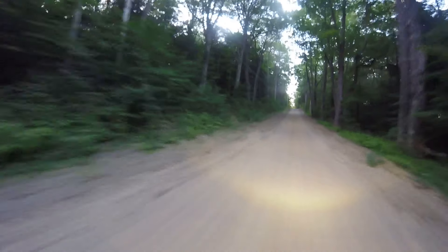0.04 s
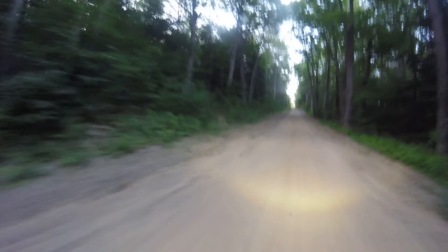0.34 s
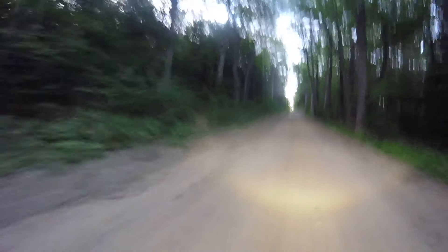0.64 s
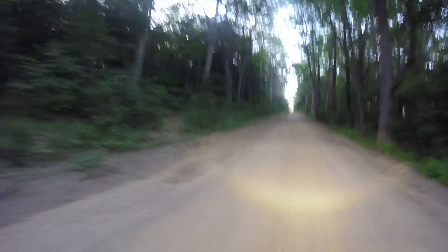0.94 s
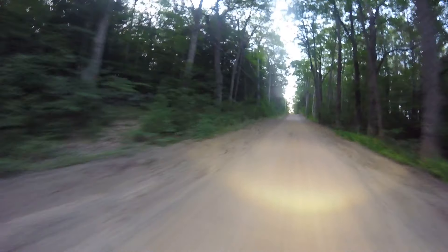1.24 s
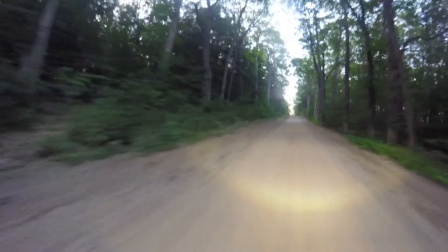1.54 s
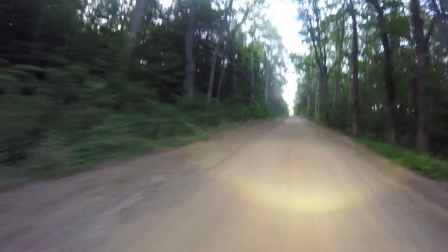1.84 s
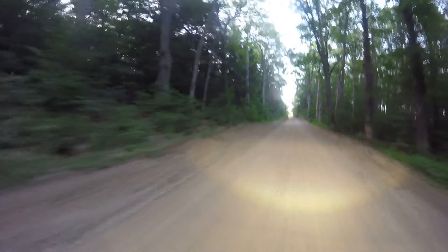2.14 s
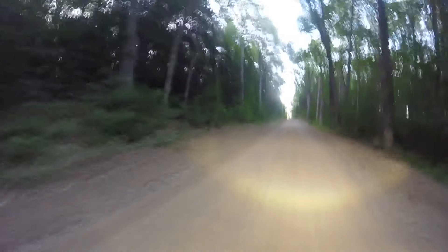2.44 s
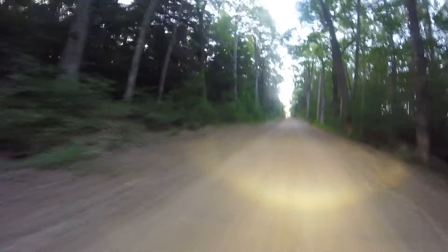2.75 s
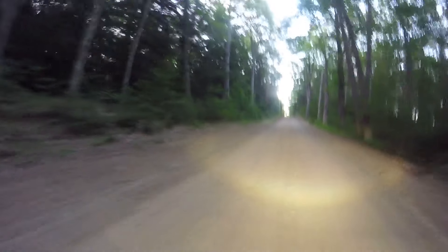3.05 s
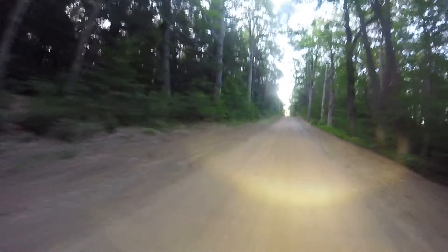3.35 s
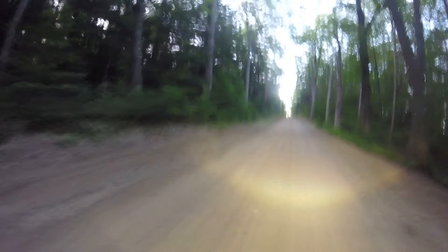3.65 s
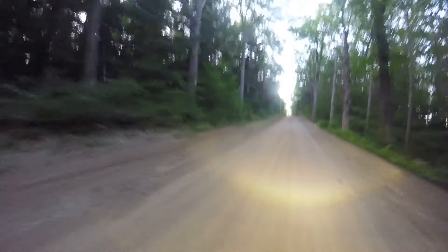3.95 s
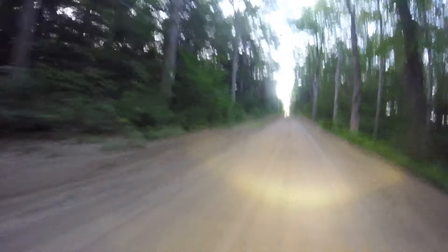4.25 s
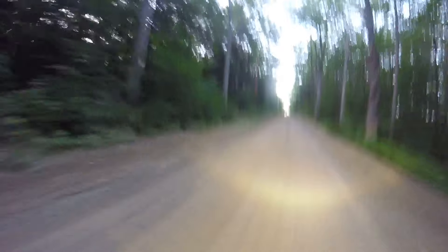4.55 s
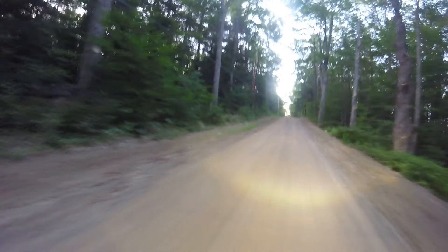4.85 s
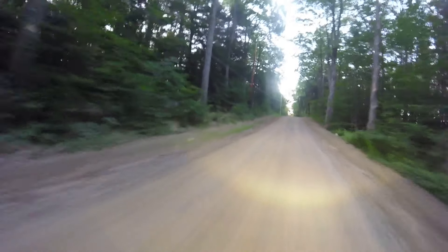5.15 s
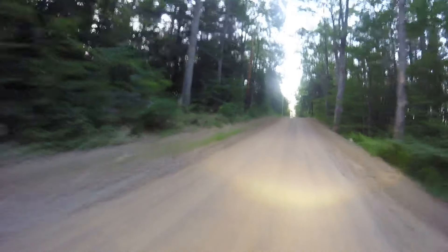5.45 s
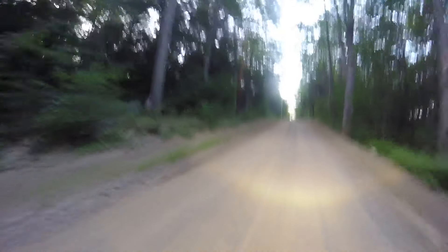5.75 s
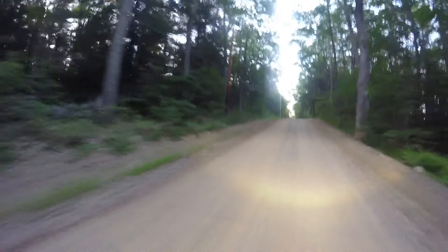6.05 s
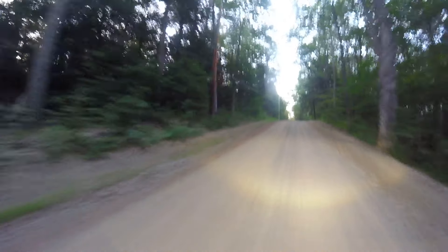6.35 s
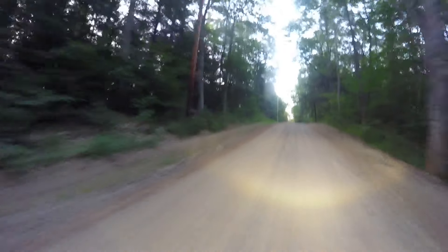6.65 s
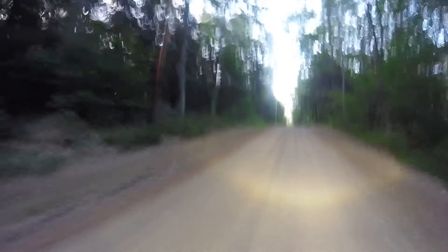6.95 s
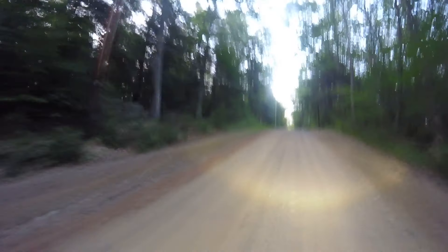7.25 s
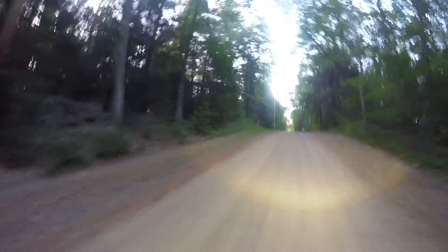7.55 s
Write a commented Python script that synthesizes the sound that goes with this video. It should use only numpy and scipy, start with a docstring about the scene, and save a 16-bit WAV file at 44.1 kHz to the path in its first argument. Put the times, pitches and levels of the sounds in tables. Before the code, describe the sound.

A vehicle drives fast along a dirt forest road, heard from a shaking microphone mounted on its outside. A deep, fluttering rumble of vibration, engine, tyres and wind runs throughout, swelling on bumps and dipping briefly. Under it lie a faint road hiss and a light crackle from the mount. Grit and small stones tick against the microphone's case, with occasional dull knocks, tiny clinks and faint squeals.

```python
"""A camera mount shakes about 32 times a second on the outside of a vehicle speeding along a dirt road.
The mount crackles at the ends of its widest swings, and gravel ticks against the camera's hard case.
Engine, tyres and wind boom through the vehicle's body, hard bumps knock, and the road hisses faintly.
Loose parts clink, scrape and squeal now and then. A limiter turns the sound down on the strongest swings."""
import sys
import numpy as np
from scipy import signal
from scipy.fft import rfft, irfft, next_fast_len
from scipy.io import wavfile
from scipy.ndimage import uniform_filter1d

SR = 44100
rng = np.random.default_rng(int(sys.argv[2]) if len(sys.argv) > 2 else 0)


def wav_record(signal):
    """Record a signal, one row per channel, as 16-bit PCM in the file named by sys.argv[1]."""
    frames = np.transpose(np.atleast_2d(signal))
    bounded = np.clip(frames, -1, 1)
    # unit amplitude maps onto the largest positive 16-bit level
    quanta = np.round(bounded * 32767).astype(np.int16)
    wavfile.write(sys.argv[1], SR, quanta)


N = 339570

# Tyres hissing on dirt. Each row: time in seconds, relative level in dB.
HISS_LEVELS = [(0.0, -50.5), (0.22, -50), (0.42, -57), (0.65, -54.5), (1.0, -51.5), (1.35, -51.5),
               (1.65, -50), (1.88, -48.5), (2.2, -53), (2.45, -56.5), (2.73, -52.5), (3.0, -52),
               (3.3, -51.5), (3.53, -50), (3.7, -52), (4.0, -49.5), (4.27, -52.5), (4.62, -54), (5.05, -52),
               (5.23, -50.5), (5.45, -51), (5.63, -50), (5.8, -52.5), (6.05, -54.5), (6.2, -50.5),
               (6.38, -59.5), (6.5, -48), (6.9, -52), (7.1, -54), (7.35, -49.5), (7.58, -49.5), (7.7, -46)]
# Fine sand washing off the tyres. Each row: time in seconds, level in dB compared with the hiss.
SAND_LEVELS = [(0.0, -8), (0.35, -4.5), (1.25, -7.5), (1.52, -3.5), (1.74, -5.5), (1.92, -5), (2.68, -8.5),
               (3.5, -9), (4.2, -9.5), (4.45, -5), (4.9, -6.5), (5.27, -6.5), (6.68, -5.5), (7.0, -9),
               (7.7, -7.5)]
# Lulls in the ride. Each row: middle in seconds, length in seconds, then how far the shaking,
# the rumble and the hiss change, in relative dB. Below zero is a dip, above zero a rise.
RIDE_LULLS = [(0.22, 0.078, -12.5, 4.5, 5), (0.326, 0.07, -15.5, -7, 1), (0.457, 0.071, -6.5, -3, 2.5),
              (0.608, 0.14, -6.5, -4, 1.5), (0.821, 0.1407, -15.5, -4.5, -7),
              (0.958, 0.068, -13.5, -11.5, -0.5), (1.312, 0.073, -13, -1.5, -0.5),
              (1.469, 0.063, -8.5, -1.5, -4.5), (1.539, 0.049, -13, -2, 1), (1.808, 0.06, -10.5, -3.5, 1),
              (1.976, 0.13, -9, -0.5, -8), (2.26, 0.068, -10.5, -5.5, 3.5), (2.561, 0.0968, -15.5, -5.5, 2),
              (2.645, 0.053, -16.5, -11.5, -1), (2.842, 0.13, -10, -3.5, -3.5),
              (2.962, 0.055, -5.5, -17, -4), (3.089, 0.139, -17, -4.5, -5), (3.323, 0.12, -7.5, -2.5, -5),
              (3.473, 0.059, -15.5, -4, -6), (3.726, 0.077, -5, -5, -1), (3.828, 0.11, -14, -6.5, -6),
              (3.951, 0.076, -11, -1, -2.5), (4.241, 0.0939, -15.5, -5.5, -1), (4.378, 0.092, -7, 3.5, 0),
              (4.777, 0.16, -7, -10.5, -2), (4.965, 0.052, -6, 0, 4), (5.132, 0.15, -4.5, -2, -5),
              (5.503, 0.063, -12.5, -3, -7), (5.906, 0.25, -2.5, -6, -5.5), (6.305, 0.081, -9.5, -2, 0),
              (6.611, 0.05, -8.5, 1, -7), (6.719, 0.13, -10.5, 1.5, -5.5), (6.884, 0.069, -11.5, 0.5, 2),
              (6.999, 0.063, -11.5, -8, 0), (7.2, 0.12, -1, -15.5, -8.5), (7.392, 0.1, -8.5, -5, -4.5),
              (7.499, 0.073, -17.5, -6, -4), (7.661, 0.1, -24, -6.5, -11.5)]
# Bumps in the road. Each row: middle in seconds, relative boom level in dB, relative panel level in dB.
ROAD_BUMPS = [(0.045, -16, -28), (0.249, -18, -28.5), (0.352, -16.5, -26), (0.701, -22.5, -30.5),
              (1.3, -19.5, -29.5), (1.44, -16, -31.5), (1.582, -16, -24), (1.7, -17, -21),
              (1.869, -14.5, -26.5), (2.099, -18.5, -31), (2.29, -24.5, -27.5), (2.641, -11, -26),
              (2.889, -17, -33), (3.01, -16.5, -29.5), (3.231, -16.5, -34.5), (3.389, -19, -33),
              (3.521, -15, -33), (4.01, -20, -30.5), (4.16, -21.5, -31.5), (4.271, -13, -24),
              (4.543, -17.5, -26), (5.031, -19, -28.5), (5.24, -19, -28.5), (5.36, -20.5, -22),
              (5.661, -20.5, -26.5), (6.188, -11, -25.5), (6.499, -17.5, -26.5), (6.633, -19, -20.5),
              (6.74, -21, -27), (7.04, -21.5, -31), (7.431, -15, -32.5), (7.541, -22.5, -26)]
# Hard bumps. Each row: start in seconds, relative knock level in dB, relative thud level in dB.
HARD_JOLTS = [(0.234, -43, -20.5), (0.692, -50, -17), (1.85, -32, -16.5), (2.863, -33, -23.5),
              (4.27, -46, -26), (4.542, -28, -18.5), (6.624, -33, -21.5), (6.711, -44, -22)]
# Faint squeals. Each row: middle in seconds, length in seconds, pitch in Hz, width of the resonance
# in Hz (wider is hoarser), relative level in dB.
RUB_SQUEALS = [(0.164, 0.52, 1310, 37, -54.5), (0.244, 0.063, 1326, 170, -43.5),
               (0.09, 0.37, 1506, 18, -56), (0.35, 0.13, 1474, 70, -57.5), (.42, 0.26, 620, 14, -58),
               (0.928, 0.22, 1297, 51, -58.5), (1.384, 0.55, 1163, 25, -58.5),
               (2.069, 0.15, 1320, 28, -54.5), (2.783, 0.19, 1307, 20, -56.5), (4.101, 0.18, 1090, 73, -57),
               (4.234, 0.12, 1370, 130, -56), (4.445, 0.12, 2560, 130, -61),
               (4.876, 0.072, 1270, 100, -50.5), (5.22, 0.087, 1300, 91, -54.5),
               (5.23, 0.083, 1500, 64, -55.5), (5.414, 0.35, 976, 46, -58)]
# Loose parts dragging. Each row: middle in seconds, length in seconds, pitch in Hz, level in dB.
PART_SCRAPES = [(0.244, 0.03, 2830, -46.5), (2.59, 0.0067, 3180, -44), (2.728, 0.0068, 3420, -43),
                (2.863, 0.041, 2620, -51), (2.884, 0.0059, 3450, -41), (2.985, 0.01, 3420, -48),
                (4.198, 0.012, 2800, -47.5), (4.535, 0.021, 2670, -38), (6.496, 0.01, 3030, -39),
                (6.631, 0.013, 3160, -40), (6.715, 0.0057, 2650, -41), (6.721, 0.063, 2550, -45),
                (6.894, 0.01, 3080, -41), (7.226, 0.015, 2550, -47)]
# Loose parts being tapped. Each row: start in seconds, peak level in dB, pitch in Hz.
PART_CLINKS = [(0.072, -31.5, 1850), (1.385, -37, 1780), (1.929, -31.5, 1780), (3.164, -39, 1710),
               (4.168, -35.5, 1750), (4.546, -25, 2770), (5.932, -39, 1530), (6.035, -34, 1744),
               (6.432, -33, 1590), (7.041, -26.5, 3060)]
# Scuffs of loose grit. Each row: middle in seconds, relative peak level in dB.
GRIT_SCUFFS = [(0.254, -34.5), (0.265, -38), (0.364, -37.5), (0.373, -39), (0.392, -34.5), (0.483, -37),
               (0.514, -35.5), (0.529, -35), (0.702, -35), (0.718, -37), (0.759, -35.5), (0.893, -39.5),
               (0.905, -36.5), (0.992, -41), (1.024, -42.5), (1.062, -46), (1.13, -37), (1.162, -36),
               (1.388, -44), (1.416, -35.5), (1.7, -35.5), (1.716, -39), (1.740, -36.5), (1.757, -35.5),
               (1.896, -31.5), (2.119, -35.5), (2.182, -36.5), (2.297, -37), (2.309, -36), (2.387, -32),
               (2.446, -36.5), (2.683, -35.5), (2.729, -37), (2.739, -33), (2.753, -42), (2.771, -35.5),
               (2.891, -38), (3.165, -39), (3.267, -44), (3.411, -38.5), (3.518, -39), (3.53, -35.5),
               (3.547, -31), (3.759, -35), (3.770, -37), (3.877, -36), (4.005, -37), (4.289, -30),
               (4.543, -30), (4.558, -42), (4.662, -34.5), (4.902, -38.5), (5.014, -35), (5.059, -34),
               (5.264, -38), (5.431, -34), (5.55, -36.5), (5.565, -39), (5.691, -34), (6.129, -37.5),
               (6.191, -34), (6.222, -32.5), (6.24, -34), (6.496, -35.5), (6.513, -33.5), (6.639, -35),
               (6.783, -36), (6.831, -38), (6.897, -41), (6.915, -31), (7.041, -39), (7.321, -36),
               (7.456, -33), (7.542, -35), (7.551, -32)]
# Stones hitting the case. Each row: time in seconds, relative level in dB, relative treble in dB.
STONE_HITS = [(0.708, -24.5, -20), (2.399, -23, -16), (3.0173, -24.5, -20.5), (3.6395, -20.5, -14),
              (4.2769, -27.5, -36), (4.5437, -23, -27), (4.6456, -22.5, -16.5), (5.6949, -16, -14.5),
              (5.8306, -19, -14), (6.7982, -24.5, -14), (6.9062, -26, -14), (6.9558, -25, -15),
              (7.1599, -19.5, -14), (7.5844, -23.5, -18)]
# The tones the case rings with. Each row: pitch in Hz, width in Hz, relative level in dB.
CASE_TONES = [(1490, 180, -2.5), (2250, 350, 4.5), (3140, 410, 2), (4010, 260, -3.5), (4960, 780, -3),
              (6670, 520, -2.5), (8200, 1100, -15.5), (11200, 2500, -24.5), (14700, 1200, -23)]

# The tone colour of each noise. Each row: frequency in Hz, relative level in dB.
SPRAY_COLOUR = [(3800, 2.5), (6500, -2), (7600, -7.5), (11000, -12), (16000, -19.5)]  # the finest gravel on the case
HISS_COLOUR = [(250, 4.5), (450, 6.5), (800, 0), (1100, 4.5), (1400, 4), (1850, -8), (2100, -11)]  # tyres and air
SAND_COLOUR = [(2000, -5.5), (2550, 1.5), (2780, -5.5), (3000, 1.5), (3400, -0.5), (4000, -14.5),
               (5200, -16.5), (6500, -25.5), (8000, -34), (16000, -48.5)]  # sand off the tyres
CRUNCH_COLOUR = [(200, -19.5), (500, 1.5), (900, 2.5), (1600, 1.5), (3000, -5.5), (5000, -12.5),
                 (8000, -20), (12000, -31), (16000, -36)]  # tiny hard contacts
KNOCK_COLOUR = [(280, 14.5), (370, -4.5), (520, -31), (1000, -1)]  # a jolt knocking the body
BOOM_COLOUR = [(35, 7.5), (48, 0), (60, 2.5), (78, -4), (98, -1.5), (120, -5), (150, -18), (190, -29)]  # the body's deep boom
PANEL_COLOUR = [(110, -24.5), (150, 2), (185, -2.5), (245, -2.5), (290, -12.5), (345, -25.5), (450, -33),
                (700, -35.5), (1500, -57)]  # drumming panels

MOUNT_HZ = 32.16  # the mount's usual swings per second
BOOM_DB, PANEL_DB = -19.5, -34  # base levels of the rumble between bumps
BOOM_SWELL_S, PANEL_SWELL_S = 0.23, 0.17  # how long a bump is heard in each


def from_db(db):
    """Turn decibels into a number to multiply by."""
    return 10 ** (np.asarray(db) / 20)


def rms_one(x):
    """Scale a signal so that its average strength (rms) is 1."""
    return x / np.sqrt(np.mean(x ** 2) + 1e-20)


def level_curve(rows):
    """Join (time, level) points with straight lines, one value per sample."""
    times, levels = np.transpose(rows)
    return np.interp(np.arange(N) / SR, times, levels)


def drift(rate_hz):
    """A smooth random wobble, about 1 in size; a higher rate wobbles faster."""
    step, warm_up = 40, 2000
    r = np.exp(-2 * step * np.pi * rate_hz / SR)
    noise = rng.standard_normal(N // step + warm_up + 2)
    slow = signal.lfilter([1], [1, -2 * r, r * r], noise)[warm_up:]
    return np.interp(np.arange(N) / step, np.arange(len(slow)), rms_one(slow))


def coloured(x, colour):
    """Give a signal a tone colour, fading steeply beyond the table's ends; strength 1."""
    points_hz, points_db = np.transpose(colour)
    size = next_fast_len(N)
    hz = np.maximum(np.fft.rfftfreq(size, 1 / SR), 1)
    ends = np.minimum(1, np.minimum(hz / points_hz[0], points_hz[-1] / hz)) ** 4
    gain = from_db(np.interp(np.log(hz), np.log(points_hz), points_db)) * ends
    return rms_one(irfft(rfft(x, size) * gain, size)[:N])


def coloured_noise(colour):
    """Fresh noise with the given tone colour."""
    return coloured(rng.standard_normal(N), colour)


def steady(x, seconds):
    """Even out the slow swells of a noise."""
    power = uniform_filter1d(x ** 2, max(int(seconds * SR), 2))
    return x / np.sqrt(np.abs(power) + 1e-9)


def resonance(x, hz, width_hz):
    """Make a signal ring at one pitch; a smaller width rings longer."""
    r = np.exp(-np.pi * width_hz / SR)
    feedback = [1, -2 * r * np.cos(2 * np.pi * hz / SR), r * r]
    return signal.lfilter(np.array([1, 0, -1]) * (1 - r * r) / 2, feedback, x + 1e-18)


def grains(per_s, spread_db):
    """Random tiny contacts, mostly weak, a few strong."""
    sizes = from_db(spread_db * np.minimum(rng.exponential(1, N), 4)) * rng.choice([-1, 1], N)
    return sizes * (rng.random(N) < per_s / SR)


def swells(middles, lengths, heights):
    """Smooth humps that rise and fall around their middles."""
    t, out = np.arange(N) / SR, np.zeros(N)
    for middle, length, height in np.broadcast(middles, lengths, heights):
        on = slice(*np.searchsorted(t, [middle - length / 2, middle + length / 2]))
        out[on] += height * np.cos(np.pi * (t[on] - middle) / length) ** 2
    return out


def bursts(rows, rise_s):
    """A loudness curve that jumps up and dies away for each (start in seconds, peak in dB)."""
    out, age = np.zeros(N + SR), np.arange(SR // 10) / SR / rise_s
    for s, peak_db in rows:
        start = int(s * SR)
        out[start:start + len(age)] += from_db(peak_db) * age * np.exp(1 - age)
    return out[:N]


def lulls():
    """Three curves: how the shaking, the rumble and the hiss change in the lulls."""
    middles, lengths, *changes_db = np.transpose(RIDE_LULLS)
    return [swells(middles, lengths, change_db) for change_db in changes_db]


def over_bumps(base_db, peak_db, length_s):
    """A loudness curve that rests at its base and swells on each bump."""
    middles = np.transpose(ROAD_BUMPS)[0]
    return from_db(base_db + swells(middles, length_s, peak_db - base_db))


def gravel_spray(lull_db, base_db=-71.0, flutter_db=3.5, lull_share=0.4):
    """The finest gravel patters on the case without a break."""
    patter = grains(per_s=2500, spread_db=7.0)
    level_db = base_db + lull_share * lull_db + flutter_db * drift(35)
    return from_db(level_db) * coloured(patter, SPRAY_COLOUR)


def road_hiss(lull_db, gain_db=0.1, flutter_db=2.5, sand_flutter_db=1.5, bump_share=0.32):
    """Tyres and air hiss under a wash of sand, dulled by the case; both rise a little on bumps."""
    middles, _, panel_db = np.transpose(ROAD_BUMPS)
    bump_db = bump_share * swells(middles, PANEL_SWELL_S, panel_db - PANEL_DB)
    level_db = level_curve(HISS_LEVELS) + gain_db + bump_db + lull_db + flutter_db * drift(17.0)
    sand_db = level_curve(SAND_LEVELS) + sand_flutter_db * drift(30)
    sand = from_db(sand_db) * coloured_noise(SAND_COLOUR)
    return from_db(level_db) * (coloured_noise(HISS_COLOUR) + sand)


def squeals(gain_db=1.5, fade_s=0.011):
    """Something rubs lightly, and the friction makes it sing at one pitch for a moment."""
    t, out = np.arange(N) / SR, np.zeros(N)
    friction = rng.standard_normal(N)
    for middle, length, hz, width_hz, level_db in RUB_SQUEALS:
        fade = np.clip((length / 2 - np.abs(t - middle)) / fade_s, 0, 1)
        tone = rms_one(resonance(resonance(friction, hz, width_hz), hz, width_hz))
        out += from_db(level_db + gain_db) * fade * steady(tone, seconds=0.06)
    return out


def scrapes(width_hz=750):
    """A loose part drags for an instant: a run of tiny slips makes it ring roughly."""
    slips = grains(per_s=9000, spread_db=6.5)
    out = np.zeros(N)
    for middle, length, hz, level_db in PART_SCRAPES:
        rasp = rms_one(resonance(resonance(slips, hz, width_hz), hz, 2 * width_hz))
        out += from_db(level_db) * swells(middle, length, 1) * rasp
    return out


def clinks(ring_s=0.0019, scuff_db=-6.5):
    """A loose part is tapped: a little scuff, and a brief ring at one pitch."""
    rings, t = np.zeros(N + SR), np.arange(SR // 10) / SR
    for s, peak_db, hz in PART_CLINKS:
        start = int(s * SR)
        ring = np.exp(-t / ring_s) * np.sin(2 * np.pi * hz * t)
        rings[start:start + len(t)] += from_db(peak_db) * ring
    contact = bursts([(s, peak_db) for s, peak_db, _ in PART_CLINKS], ring_s / 2)
    return rings[:N] + from_db(scuff_db) * contact * coloured_noise(CRUNCH_COLOUR)


def grit(length_s=0.0071, gain_db=-1.0, rebound_db=-20.0, stone_rebound_db=-50.5):
    """Brief sprays of fine grains; a weak one follows half a swing after each scuff and stone."""
    half_swing_s = .5 / MOUNT_HZ
    rebounds = [(s + half_swing_s, peak_db + rebound_db) for s, peak_db in GRIT_SCUFFS]
    after_stones = [(row[0] + half_swing_s, stone_rebound_db) for row in STONE_HITS]
    middles, peak_db = np.transpose(GRIT_SCUFFS + rebounds + after_stones)
    crunch = coloured(grains(per_s=13000, spread_db=2.0), CRUNCH_COLOUR)
    return swells(middles, length_s, from_db(peak_db + gain_db)) * crunch


def stones(bounce_s=0.00075, bounce_db=-5.5, graze_db=-32, graze_s=0.0033, crack_db=-5.5, gain_db=-18.5):
    """A stone cracks against the case and chatters; the case rings differently at each spot."""
    lead = SR // 200  # samples of grazing before the hit
    out, t = np.zeros(N + SR), (np.arange(SR // 20) - lead) / SR
    crack_band = signal.butter(2, [1300, 3900], "band", fs=SR, output="sos")
    for s, level_db, treble_db in STONE_HITS:
        contact = from_db(graze_db) * rng.standard_normal(len(t)) * np.exp(-np.abs(t) / graze_s)
        contact[lead] += 1  # the hit itself, then three ever weaker bounces
        delays_s = np.cumsum(bounce_s * (.5 + rng.random(size=3)))
        for k, delay_s in enumerate(delays_s, 1):
            contact[lead + int(delay_s * SR)] += from_db(k * bounce_db) * rng.choice([-1, 1])
        bright_db = 0.9 * (treble_db + 14)  # treble below -14 dulls the high tones
        tick = from_db(crack_db) * signal.sosfilt(crack_band, contact)
        for k, (hz, width_hz, tone_db) in enumerate(CASE_TONES):
            strength = from_db(tone_db + bright_db * (hz > 4500) + 1.5 * rng.standard_normal())
            spot_hz = hz * (1 + 0.013 * rng.standard_normal())
            tick += (-1) ** k * strength * resonance(contact, spot_hz, width_hz)
        start = int(s * SR) - lead
        out[start:start + len(t)] += from_db(level_db + gain_db) * rms_one(tick)
    return out[:N]


def jolts(knock_s=0.005, knock_gain_db=-5.5, thud_hz=160, thud_width_hz=90, thud_s=0.0075):
    """A hard bump gives a short, dull knock over a low thud of the body."""
    knock_noise = steady(coloured_noise(KNOCK_COLOUR), seconds=0.022)
    knock = bursts([(s, db) for s, db, _ in HARD_JOLTS], knock_s) * knock_noise
    ring = resonance(resonance(rng.standard_normal(N), thud_hz, thud_width_hz), thud_hz, thud_width_hz)
    thud_noise = steady(rms_one(ring), 2 * thud_s) / np.sqrt(2)
    thud = bursts([(s, db) for s, _, db in HARD_JOLTS], thud_s) * thud_noise
    return from_db(knock_gain_db) * knock + thud


def body_rumble(lull_db, boom_flutter_db=2.5, panel_flutter_db=2.07, lull_share=0.86):
    """The vehicle's body booms deeply and its panels drum unevenly; both swell on the bumps."""
    _, boom_db, panel_db = np.transpose(ROAD_BUMPS)
    boom = steady(coloured_noise(BOOM_COLOUR), seconds=0.035)
    panels = steady(coloured_noise(PANEL_COLOUR), seconds=0.036)
    boom *= over_bumps(BOOM_DB, boom_db + 2.0, BOOM_SWELL_S)
    boom *= from_db(boom_flutter_db * drift(7.3))
    panels *= over_bumps(PANEL_DB, panel_db - 1.4, PANEL_SWELL_S)
    panels *= from_db(panel_flutter_db * drift(24))
    return from_db(lull_share * lull_db) * (boom + panels)


def mount_crackle(swing, slack=0.44, slip_db=-43.0, tick_db=-63):
    """The mount's joint ticks as it shakes, and slips in tiny steps once a swing takes up its slack."""
    load = np.clip((np.abs(swing) - slack) / 0.22, 0, 1.1)
    slips = coloured(grains(per_s=8000, spread_db=6.0), CRUNCH_COLOUR)
    shaking = rms_one(uniform_filter1d(np.abs(swing), size=SR // 20))
    ticks = coloured(grains(per_s=150, spread_db=9.5), CRUNCH_COLOUR)
    return from_db(slip_db) * load * slips + from_db(tick_db) * shaking * ticks


def mount_shake(lull_db, base_db=-9.5, widen_db=1.5, flutter_db=1.35, slowing_hz_per_db=0.43):
    """Bumps keep the mount swinging unevenly, wider where grit or stones strike; wide swings are slower."""
    strikes_s = [row[0] for row in GRIT_SCUFFS + STONE_HITS]
    roughness = np.minimum(swells(strikes_s, lengths=0.1091, heights=0.884), 1)
    width_db = widen_db * roughness + lull_db + flutter_db * drift(22)
    wander = 1 + 0.1205 * drift(9.08)
    hz = (MOUNT_HZ - slowing_hz_per_db * width_db) * wander
    # A bump that stops the swing starts it again out of step: deep, long lulls set it back most.
    lost_turns = np.cumsum(lull_db ** 2) / SR / 9.0
    turns = np.cumsum(hz) / SR - lost_turns
    return from_db(base_db + width_db) * np.sqrt(2) * np.sin(2 * np.pi * turns)


def limiter(x, threshold_db=-5.5, release_db_per_s=50, attack_s=0.015):
    """Strong swings turn everything down, so the hiss dips under them and returns in the lulls."""
    over_db = np.maximum(20 * np.log10(np.abs(x) + 1e-9) - threshold_db, 0)
    ramp = release_db_per_s * np.arange(N) / SR
    held_db = np.maximum.accumulate(over_db + ramp, axis=-1) - ramp  # catch each peak, let go slowly
    r = np.exp(-1 / (attack_s * SR))
    cut_db = signal.lfilter([1 - r], [1, -r], held_db)
    return x * from_db(-cut_db)


def scene():
    """Add all the sources into one channel."""
    shake_lull_db, rumble_lull_db, hiss_lull_db = lulls()
    swing = mount_shake(shake_lull_db) + body_rumble(rumble_lull_db)
    rattles = mount_crackle(swing) + jolts() + clinks() + scrapes() + grit() + stones()
    background = road_hiss(hiss_lull_db) + gravel_spray(hiss_lull_db) + squeals()
    return (swing + rattles + background)[None]


def record(dry):
    """Hold down the loudest moments and cut the treble above 18000 Hz."""
    low_pass = signal.cheby2(12, 70, 18000, fs=SR, output="sos")
    return signal.sosfilt(low_pass, limiter(dry))


dry = scene()
out = record(dry)
wav_record(out)
```